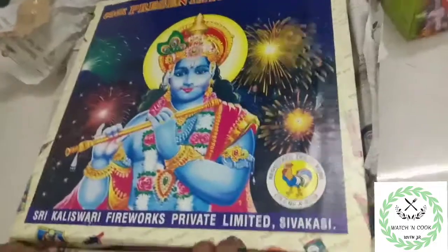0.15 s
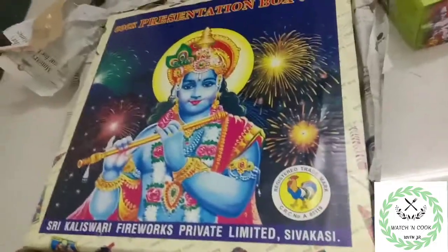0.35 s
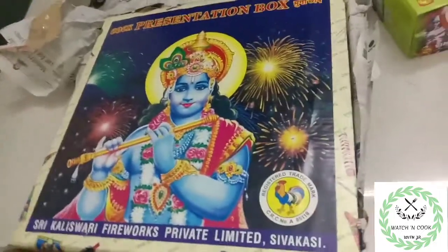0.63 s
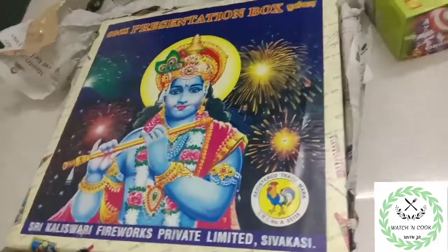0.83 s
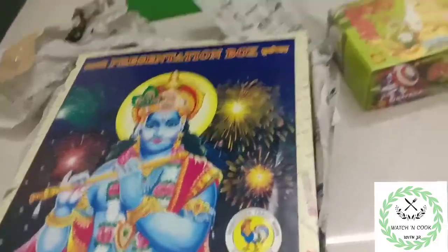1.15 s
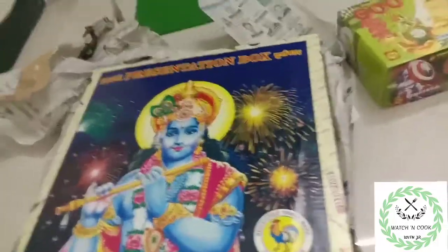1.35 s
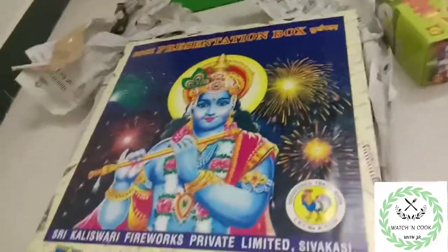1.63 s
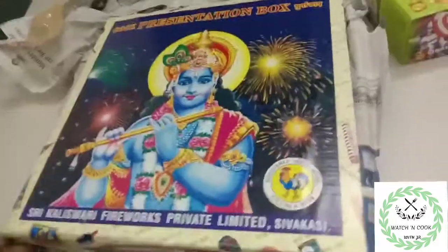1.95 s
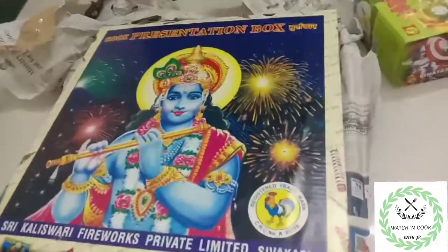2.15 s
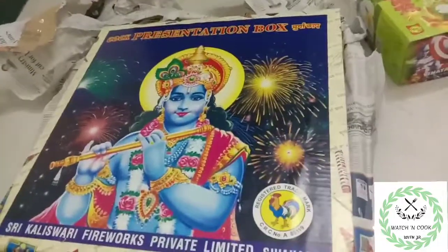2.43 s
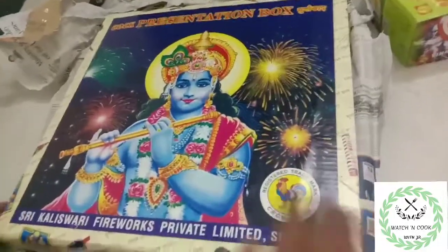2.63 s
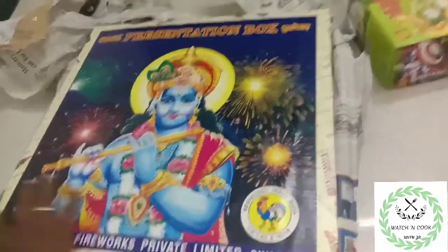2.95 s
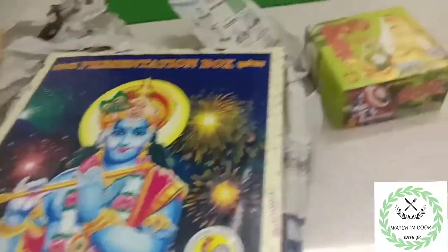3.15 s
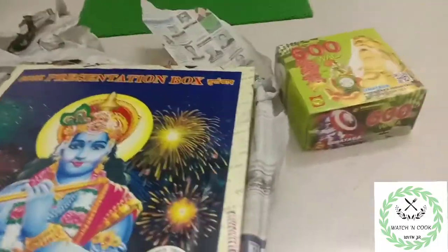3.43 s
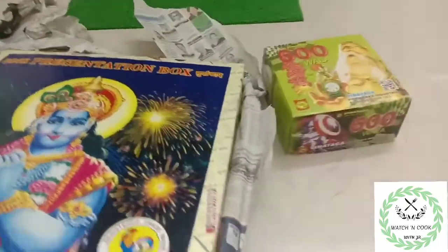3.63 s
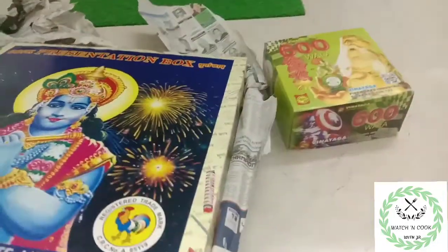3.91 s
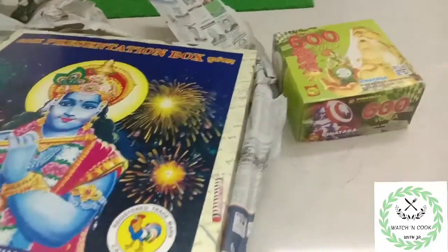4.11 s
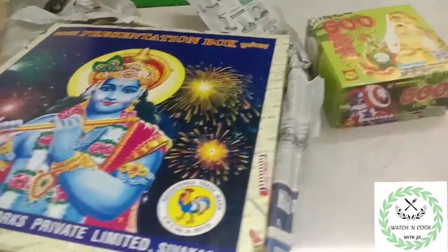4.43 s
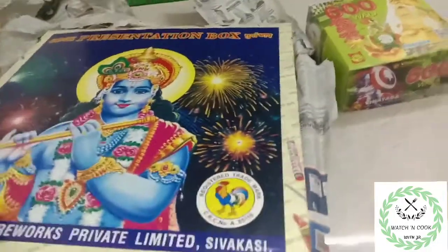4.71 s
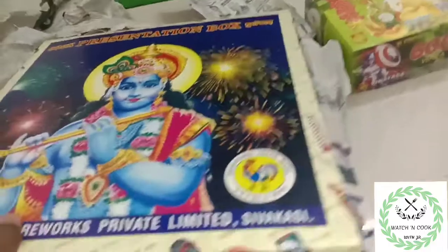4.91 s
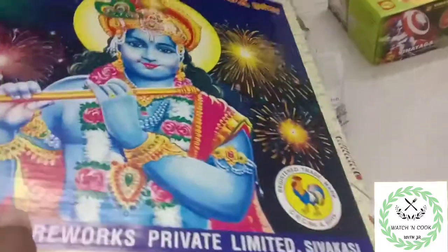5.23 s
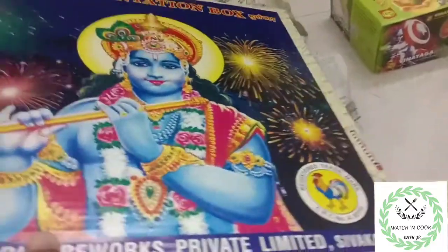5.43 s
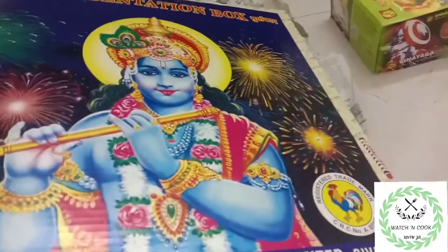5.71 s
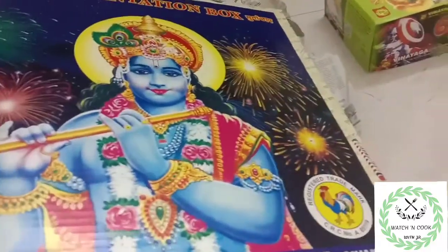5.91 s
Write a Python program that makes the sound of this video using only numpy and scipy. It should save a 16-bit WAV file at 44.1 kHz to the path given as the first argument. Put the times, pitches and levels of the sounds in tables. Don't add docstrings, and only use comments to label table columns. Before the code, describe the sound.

Newspaper crackles and snaps crisply as a cardboard box is shifted and knocked on a hard surface, close up in an echoing tiled room.

```python
import sys
import numpy as np
from scipy import signal
from scipy.fft import rfft, irfft, next_fast_len
from scipy.io import wavfile
from scipy.ndimage import uniform_filter1d

SR = 44100
rng = np.random.default_rng(int(sys.argv[2]) if len(sys.argv) > 2 else 0)


def volts_from_decibels(level):
    exponent = np.asarray(level, float) / 20
    return 10 ** exponent


def store_wav(level_fs):
    pcm = np.round(np.clip(np.atleast_2d(level_fs), -1, 1) * 32767)
    wavfile.write(sys.argv[1], SR, pcm.T.astype(np.int16))


N = 267376


def unit(x):
    return x / np.sqrt(np.mean(x ** 2))


def band(x, lo_hz, hi_hz):
    sos = signal.butter(2, [lo_hz, hi_hz], "bandpass", fs=SR, output="sos")
    return signal.sosfilt(sos, x)


def colour(x, spectrum):
    hz, db = np.transpose(spectrum)
    size = next_fast_len(len(x))
    f = np.arange(size // 2 + 1) * SR / size + 1
    gain = volts_from_decibels(np.interp(np.log(f), np.log(hz), db))
    return irfft(rfft(x, size) * gain, size)[:len(x)]


def walk(rate_hz):
    hold = int(SR / rate_hz)
    levels = np.repeat(rng.standard_normal(N // hold + 1), hold)
    return 0.71 * uniform_filter1d(uniform_filter1d(levels, hold), hold)[:N]


def clicks(rate_hz, spread_db, ring_s):
    count = int(rate_hz * N / SR)
    power = np.zeros(N)
    size = np.minimum(rng.exponential(size=count), 2.6)
    power[rng.integers(0, N, count)] = volts_from_decibels(2 * spread_db * size)
    decay = np.exp(-2 * np.log(1000) / (ring_s * SR))
    puffs = signal.lfilter([1], [1, -decay], power)
    return unit(np.sqrt(puffs) * rng.standard_normal(N))


def swells(s, db, rise_s, fade_db_per_s, rest_db):
    steps = np.arange(0, N + 64, 64)
    since = steps / SR - s[:, None]
    rising = -15 / rise_s[:, None]
    slope = np.where(since < 0, rising, np.reshape(fade_db_per_s, (-1, 1)))
    gestures = volts_from_decibels(2 * (db[:, None] - slope * since)).sum(axis=0)
    power = np.interp(np.arange(N), steps, gestures)
    return 10 * np.log10(power + volts_from_decibels(2 * rest_db))


def air():
    # f/Hz, level/dB
    ambience = [(26, -40), (45, -10), (177, -6), (208, -20), (380, -1), (408, 3.5), (728, -17.5),
                (876, -3.5), (1240, -3.5), (1640, -10.5), (2430, -8), (2670, -8), (6000, -27.5),
                (6400, -42), (11500, -47.5), (15000, -49), (22000, -120)]
    whine = volts_from_decibels(-16) * unit(band(rng.standard_normal(N), 1252, 1280))
    hum = volts_from_decibels(0.74 * walk(4.97)) * unit(colour(rng.standard_normal(N), ambience))
    return volts_from_decibels(-48) * (hum + whine)


def tail(t60_s):
    h = rng.standard_normal(SR) * volts_from_decibels(-60 * np.arange(SR) / SR / t60_s)
    return h / np.sqrt(np.sum(h ** 2))


def room(x):
    # f/Hz, level/dB
    echo_colour = [(100, -0.5), (600, 1.5), (1250, -4), (2200, 0), (3600, 0.5), (5500, -1)]
    body = colour(band(tail(0.87), 50, 6600), echo_colour)
    treble = 0.46 * band(tail(0.18), 9300, 16000)
    gap = np.zeros(int(.006 * SR))
    return volts_from_decibels(-5) * signal.fftconvolve(x, np.r_[gap, 2 * (body + treble)])[:N]


def box_rumble():
    # peak t/s, rumble level/dB, swell and fade t/s
    shoves = [(0.08, -56, 0.099), (0.53, -58, 0.05), (0.71, -50.5, 0.044), (0.93, -43, 0.056),
              (1.1, -46, 0.064), (1.3, -70, 0.043), (1.69, -49, 0.023), (1.75, -41, 0.064),
              (1.94, -42, 0.15), (2.2, -56, .15), (3.118, -43, 0.049), (3.41, -50.5, 0.11),
              (3.49, -54, .08), (3.62, -46, 0.23), (3.88, -49, 0.091), (4.05, -44, 0.059),
              (4.168, -46.5, 0.12), (4.62, -48, 0.12), (4.78, -44.5, 0.45), (4.89, -56, 0.037),
              (4.96, -45.5, 0.24), (5.1, -45, 0.063), (5.21, -46.5, 0.28), (5.54, -46.5, 0.09),
              (5.7, -47, 0.14), (6.04, -43.5, 0.41)]
    # f/Hz, level/dB
    box_spectrum = [(32, -11), (55, -14), (92, -2), (218, 2), (254, -8.5), (284, -3), (330, -4), (430, -6),
                    (730, -120)]
    s, db, length = np.transpose(shoves)
    rumble_db = swells(s, db, length, 15 / length, rest_db=-61)
    bumps = clicks(60, spread_db=3, ring_s=0.14) + 1.06 * rng.standard_normal(N)
    return volts_from_decibels(rumble_db + 0.23 * walk(5.8)) * unit(colour(bumps, box_spectrum))


def box_knocks():
    # t/s, peak level/dB, pitch f/Hz, ring t/s, slap level/dB
    strikes = [(0.485, -51, 177, 0.22, 16), (0.685, -39.5, 283, 0.12, 10), (1.683, -41, 175, 0.16, 5),
               (1.929, -39.5, 190, 0.17, -11), (1.964, -45, 189, 0.067, -7), (2.118, -40, 101, 0.053, -19),
               (2.194, -40.5, 94, 0.23, -25), (2.24, -44, 125, 0.061, -16), (3.083, -40.5, 220, 0.094, -5),
               (3.124, -42, 96, 0.13, -9), (3.342, -46.5, 289, 0.13, 8), (3.4462, -27, 205.5, 0.11, 1.5),
               (3.472, -35, 232, 0.11, -7), (3.494, -41, 222, 0.069, 4), (3.52, -44, 239, 0.055, -3),
               (3.574, -36, 294, 0.077, 2.5), (4.049, -46, 142, 0.19, -6), (4.63, -40.5, 247, 0.085, 5.5),
               (5.129, -44, 181, 0.039, -4), (5.948, -45.5, 132, 0.21, -8)]
    # f/pitch, level/dB, share of the ring
    modes = [(1, 0.5, 1), (1.4, -4, 1.0), (2.1, -8.5, 0.68), (3.0, -9, 0.34), (3.9, -18, 0.53),
             (4.8, -13, 0.36)]
    out, t = np.zeros(N + 8192), np.arange(8192) / SR
    slap_shape = np.minimum(t / 0.0013, 1) * volts_from_decibels(-60 * t / 0.13)
    for s, db, hz, ring_s, slap_db in strikes:
        boom = np.zeros(8192)
        for ratio, mode_db, share in modes:
            decay = volts_from_decibels(mode_db - 60 * t / (ring_s * share))
            boom -= decay * np.sin(2 * np.pi * ratio * hz * t)
        slap = band(rng.standard_normal(8192) * slap_shape, 214, 1130)
        slap = volts_from_decibels(slap_db) * slap / np.abs(slap).max()
        start = int((s + .0025) * SR)
        out[start:start + 8192] += volts_from_decibels(db + 3.0) * (boom + slap)
    return out[:N]


def crease_snaps():
    # t/s, peak level/dB, centre f/Hz, low-mid level above it/dB
    sharp_creases = [(0.039, -22, 3500, -1), (0.0442, -20, 2670, 8), (0.2385, -32, 3300, -16),
                     (0.2574, -11, 3400, -18), (0.2699, -22, 3340, -6), (0.486, -12, 2920, -5.5),
                     (0.4974, -29, 5800, -20), (0.5256, -10.5, 3050, -15), (0.6912, -6, 3450, -9),
                     (0.695, -8.5, 3020, 1), (0.7437, -11, 3730, -3), (0.7777, -16, 3070, -7),
                     (0.9794, -17, 5900, -17), (1.622, -18, 5630, -23), (1.69, -9.5, 3750, -2),
                     (1.6955, -7.5, 2900, -24), (1.7523, -8, 3370, -11.5), (1.7557, -6.5, 3200, -6),
                     (1.7944, -24, 3560, -23), (2.1322, -16, 2600, -14), (2.9252, -12, 2730, -2),
                     (2.9287, -13.5, 2800, -5.5), (3.6467, -12, 3820, -28), (3.7043, -13, 2660, -6.5),
                     (3.8846, -17, 2580, -24), (3.906, -23, 4970, -15), (3.9171, -7.5, 5530, -10),
                     (3.919, -21.5, 2700, -1), (4.145, -12, 2520, -4.5), (4.616, -22.5, 2900, 2),
                     (4.627, -18, 2904, -16), (4.6312, -17, 3040, -6), (4.6586, -21.5, 3300, -1),
                     (4.891, -7, 2640, -33), (4.9108, -15.5, 2670, -4), (4.963, -20, 2490, -8),
                     (5.0948, -19, 2600, 3), (5.5566, -14.5, 3450, -7), (5.7632, -14, 3220, -14),
                     (5.8015, -13, 2600, -19), (5.8901, -18, 2190, -10), (5.9805, -13.5, 4170, -19)]
    # t/s, peak level/dB
    uniform_creases = [(0.071, -24), (0.704, -3), (0.7275, -12), (0.76, -10), (0.8, -22), (1.149, -25),
                       (1.1968, -20), (1.318, -22), (1.9664, -22), (2.038, -28), (2.2976, -19), (2.394, -21),
                       (2.421, -19), (2.7158, -18.5), (3.255, -18.5), (3.395, -29), (3.5085, -20),
                       (3.594, -31), (3.6604, -18), (3.8803, -13), (3.954, -28), (4.0037, -17), (4.0142, -18),
                       (4.139, -20), (4.1707, -16), (4.567, -20), (4.582, -17.5), (4.853, -35), (4.948, -13),
                       (4.986, -22), (5.005, -19), (5.044, -10), (5.0789, -12), (5.2706, -28), (5.4242, -22),
                       (5.7195, -24)]
    out, t = np.zeros(N + 2048), np.arange(2048) / SR
    creases = [(*row, 0.0082) for row in sharp_creases]
    creases += [(*row, 2920, -9.5, 0.0067) for row in uniform_creases]
    for s, db, hz, body_db, ring_s in creases:
        rings = ring_s * np.array([[1], [1.6]])
        burst = rng.standard_normal((2, 2048)) * volts_from_decibels(-60 * (t / rings) ** 2.03)
        burst[:, 0] = 3
        centre = band(burst[0], hz / 1.274, hz * 1.35)
        body = band(burst[1], 977, 1550)
        crack = centre / np.abs(centre).max() + volts_from_decibels(body_db) * body / np.abs(body).max()
        start = int(s * SR)
        out[start:start + 2048] += volts_from_decibels(db - 10.0) * crack
    return out[:N]


def fold_ticks():
    # t/s, peak level/dB
    folds = [(0.0704, -27.5), (0.2413, -39), (0.486, -24.5), (0.662, -28.5), (0.6902, -14), (0.8679, -36),
             (1.6897, -18.5), (1.7542, -19.5), (1.9668, -36), (1.985, -42), (2.028, -39), (2.039, -44),
             (2.132, -35), (2.154, -41), (2.18, -40), (2.225, -41.5), (2.299, -33), (2.375, -31),
             (2.42, -29.5), (2.503, -35.5), (2.716, -38), (2.735, -42), (3.256, -33.5), (3.611, -29),
             (3.648, -29), (3.745, -33), (3.907, -32), (3.917, -27), (3.9555, -29), (3.9685, -30),
             (4.0972, -32), (4.581, -31), (4.6259, -22), (4.6544, -27.5), (4.852, -27), (4.868, -26.5),
             (5.0936, -25), (5.179, -28.5), (5.2648, -28.5), (5.4224, -29), (5.431, -32), (5.5571, -21.5),
             (5.7195, -30), (5.7245, -32.5), (5.89, -29.5)]
    out, t = np.zeros(N + 2048), np.arange(2048) / SR
    shape = np.minimum(t / 0.00123, 1) * volts_from_decibels(-60 * t / 0.014)
    for s, db in folds:
        puff = rng.standard_normal(2048) * shape
        tick = band(band(puff, 4000, 10240), 4640, 12000) + volts_from_decibels(-18) * band(puff, 12500, 15500)
        start = int(s * SR)
        out[start:start + 2048] += volts_from_decibels(db + 1.5) * tick / np.abs(tick).max()
    return out[:N]


def paper_rustle():
    # peak t/s, crumpling level/dB, rise t/s, crisp treble above the crumpling/dB
    pulls = [(0.06, -42, 0.18, -1), (0.25, -40, 0.015, -4.5), (0.325, -40.5, 0.091, -4),
             (0.39, -44, 0.085, -7), (0.495, -36, 0.017, -2.5), (0.58, -52, 0.07, -6),
             (0.705, -35, 0.052, -2), (0.83, -35, 0.32, -6), (0.96, -42.5, 0.2, 2.5),
             (1.17, -49.5, 0.094, 3), (1.635, -39, 0.088, -3), (1.695, -33.5, 0.032, -6),
             (1.77, -53, .012, -21), (2.02, -41.5, 0.21, -12.5), (2.3, -47.5, 0.2, -4),
             (2.42, -44.5, 0.088, -8), (2.96, -37.5, 0.08, -17), (3.4, -44.5, 0.48, -27),
             (3.6, -40, 0.14, -2), (3.68, -37.5, 0.17, -7.5), (3.78, -40, 0.29, -24),
             (3.93, -38.5, 0.17, -6.5), (4.05, -37.5, 0.16, -11), (4.18, -39, 0.12, -6),
             (4.62, -36, 0.094, -6), (4.94, -40, 0.035, -4), (5.0, -31, 0.23, -10),
             (5.07, -34.5, 0.16, -8.5), (5.42, -40.5, 0.017, -4), (5.555, -40.5, 0.07, -2.5),
             (5.73, -39.5, 0.015, -2), (5.85, -36, 0.18, -11.5), (6.04, -34.5, 0.19, -10.5)]
    # t/s, faint crumpling level/dB
    fidget = [(0, -53), (1.2, -46), (1.45, -48), (1.6, -46.5), (2.55, -52.5), (2.72, -49), (2.9, -52.5),
              (3.25, -51), (4.2, -48.5), (4.45, -74), (4.56, -61), (4.8, -62), (5.3, -43), (6.06, -79)]
    # f/Hz, level/dB
    paper_spectrum = [(250, -25), (510, -2), (720, -5.5), (970, -5), (1260, 1), (1640, -4), (3070, -3),
                      (4570, -9.5), (6000, -7.5), (6400, -12), (9140, -12.5), (11500, -21.5), (13300, -36),
                      (14100, -37), (14700, -26.5), (15300, -29.5), (15700, -40)]
    s, db, rise, crisp = np.transpose(pulls)
    fidget_db = np.interp(np.arange(N) / SR, *np.transpose(fidget))
    crumple_db = swells(s, db, rise, 54, fidget_db)
    crisp_db = swells(s, db + crisp, rise, 78, fidget_db - 5.5) - crumple_db + 6.5
    flap_db = swells(s, db - 7.5, rise, 28.5, -50) - crumple_db + 1.5
    out = np.zeros(N)
    broad = clicks(500, spread_db=3.0, ring_s=0.0031)
    for hz in 330 * 2 ** np.arange(0, 5.6, .5):
        own = clicks(600, spread_db=4.0, ring_s=0.036)
        grains = 0.57 * broad + own + 0.49 * rng.standard_normal(N)
        high = np.clip(np.log2(hz / 4400) * 1.1, 0, 1)
        low = np.clip(np.log2(2200 / hz) * 2.9, 0, 1)
        band_db = crumple_db + high * crisp_db + low * flap_db + 2.55 * walk(14)
        grains = unit(band(grains, hz / 2 ** 0.26, hz * 2 ** 0.15))
        out += volts_from_decibels(band_db) * grains * np.sqrt(hz / 3000)
    return volts_from_decibels(-1.0) * colour(out, paper_spectrum)


def scene():
    cracks, thumps = crease_snaps() + fold_ticks(), box_knocks()
    echo = room(cracks + 0.43 * thumps)
    return np.tile(air() + echo + box_rumble() + thumps + cracks + paper_rustle(), (2, 1))


def housing(x):
    # f/Hz, width f/Hz, lift level/dB
    cavities = [(1261.4, 118, 5), (3050, 790, 1), (378, 9.1, -2.5)]
    heard = x.copy()
    for hz, width_hz, db in cavities:
        heard += (volts_from_decibels(db) - 1) * band(x, hz - width_hz / 2, hz + width_hz / 2)
    return signal.sosfilt(signal.butter(2, 62, "highpass", fs=SR, output="sos"), heard)


def spectral_gate(x):
    # f/Hz, level/dB
    threshold = [(9000, -87), (11000, -60.5), (12500, -59.5), (13600, -58.5), (14700, -55.5),
                 (16000, -59.5)]
    # from t/s, to t/s, upper limit f/Hz, share of other bands lost
    heavy_spells = [(.12, .17, 16000, .25), (.33, .38, 10500, .25), (.45, .45, 9000, .35),
                    (.473, .473, 7500, .85), (.659, .659, 11000, .9), (.985, 1.1, 11000, .4),
                    (1.13, 1.26, 11000, .3), (1.51, 1.57, 11500, .47), (1.6, 1.6, 16000, .7),
                    (1.8, 1.84, 8400, .6), (2.445, 2.445, 6500, .8), (2.47, 2.47, 9000, .2),
                    (3.26, 3.31, 16000, .3), (3.7, 3.7, 16000, .3), (3.865, 3.865, 6300, .1),
                    (4.0, 4.0, 7500, .2), (4.05, 4.05, 7000, .2), (4.37, 4.47, 10000, .2),
                    (4.908, 4.908, 5000, .1), (5.118, 5.118, 6500, .1), (5.186, 5.186, 9500, .3),
                    (5.84, 5.84, 7000, .2), (6.045, 6.045, 7000, .3)]
    # t/s, below f/Hz
    bass_gaps = [(.36, 170), (.473, 250), (.496, 90), (.659, 420), (.682, 170), (.99, 400), (1.055, 0),
                 (1.2, 80), (1.23, 80), (1.425, 160), (1.52, 280), (1.59, 90), (1.61, 330), (1.635, 90),
                 (1.65, 80), (1.68, 160), (1.8, 420), (1.82, 250), (2.445, 250)]
    # from t/s, to t/s
    wide_spells = [(0.125, 0.38), (0.45, 0.542), (0.635, 0.891), (0.96, 1.727), (1.843, 1.936),
                   (2.168, 2.307), (2.47, 2.609), (2.725, 2.864), (3.097, 3.468), (3.561, 3.793),
                   (3.956, 4.049), (4.234, 4.56), (4.699, 5.07), (5.163, 5.395), (5.581, 5.86),
                   (5.976, 6.046)]
    hop, grid = 1024, 371
    n = np.arange(2 * hop) + .5
    window = np.sin(np.pi / 2 * np.sin(np.pi * n / (2 * hop)) ** 2)
    basis = np.sqrt(2 / hop) * np.cos(np.pi / hop * np.outer(n + hop / 2, np.arange(hop) + .5))
    starts = np.arange(grid, N + hop, hop)
    frames = np.pad(x, (hop, 2 * hop))[starts[:, None] + np.arange(2 * hop)]
    bins = (frames * window) @ basis
    edges = np.r_[0:48:4, 48:hop + 1:16]
    width, hz, s = np.diff(edges), edges[:-1] * SR / (2 * hop), starts / SR
    level = np.sqrt(np.add.reduceat(bins ** 2, edges[:-1], axis=1) / width)
    luck = rng.random(level.shape)

    treble = np.pad(band(x, 7000, 12000), (hop, 2 * hop))
    treble = treble[starts[:, None] + np.arange(hop // 2, 3 * hop // 2)]
    sharp = np.abs(treble).max(axis=1) > 5.2 * treble.std(axis=1)
    thrift_db = 3 * rng.standard_normal(len(s)) - 10 * sharp
    limit_db = np.interp(hz, *np.transpose(threshold)) + 8.0 * luck + thrift_db[:, None]
    keep = 1. * (level > volts_from_decibels(limit_db))

    for t0, t1, top_hz, share in heavy_spells:
        now = (s > t0 - hop / SR / 2) & (s <= t1 + hop / SR / 2)
        exposed = hz < 900
        exposed |= (hz < 2300) & (share > .7)
        exposed |= (hz > 7300) & (hz < 9300) & (share > .45)
        chance = .5 * luck[now].min(axis=0) + .5 * luck[now]
        lost = exposed & (chance < .8 * share)
        keep[now] *= np.where(hz > top_hz, volts_from_decibels(-35), np.where(lost, volts_from_decibels(-29), 1))
    for t0, below_hz in bass_gaps:
        keep[np.abs(s - t0).argmin(), hz < below_hz] *= volts_from_decibels(-40)
    keep[(hz < 900) & (rng.random(level.shape) < .05)] *= volts_from_decibels(-40)

    side_db = -23 + 1.6 * np.log2(1 + hz / 5000) + 5.8 * rng.standard_normal(level.shape)
    apart = keep * level * volts_from_decibels(side_db)
    wide = sum((s > t0 - .01) & (s < t1 + .01) for t0, t1 in wide_spells)
    share = np.where(wide, .8, .15) + 0.2 * rng.standard_normal(len(s))
    apart *= rng.random(level.shape) < share[:, None] - .1 * (hz / 11000) ** 4

    coarse = np.arange(hop) * SR / (2 * hop) > 6200
    count = coarse.sum()
    uneven_db = np.linspace(4.3, 11, count) * rng.standard_normal((len(s), count)) - np.linspace(3, 12, count)
    bins[:, coarse] *= volts_from_decibels(uneven_db * ~sharp[:, None])

    mid = bins * np.repeat(keep, width, axis=1)
    side = rng.standard_normal(bins.shape) * np.repeat(apart, width, axis=1)
    frames = (np.array([mid, side]) @ basis.T) * window
    first = np.pad(frames[..., :hop], ((0, 0), (0, 1), (0, 0)))
    second = np.pad(frames[..., hop:], ((0, 0), (1, 0), (0, 0)))
    return (first + second).reshape(2, -1)[:, hop - grid:hop - grid + N]


def low_pass(x):
    return signal.sosfilt(signal.butter(12, 15710, fs=SR, output="sos"), x)


def record(dry):
    mid, side = spectral_gate(housing(dry[0]))
    return low_pass(np.array([mid + side, mid - side]))


dry = scene()
out = record(dry)
store_wav(out)
```